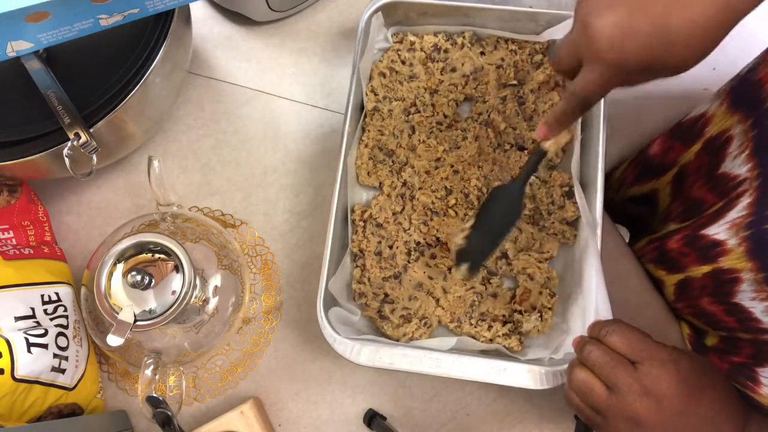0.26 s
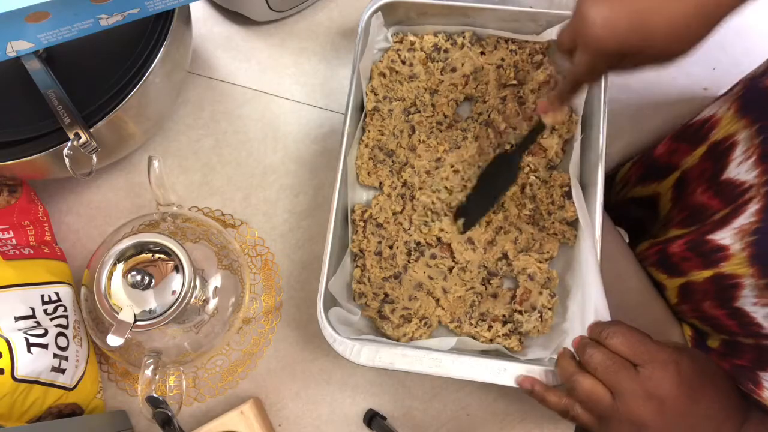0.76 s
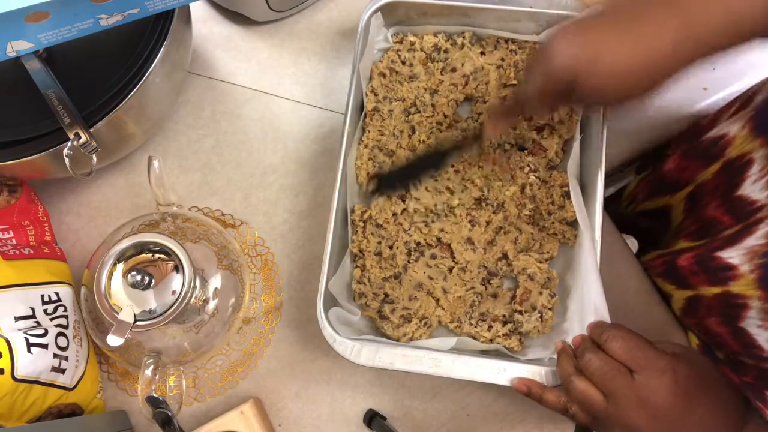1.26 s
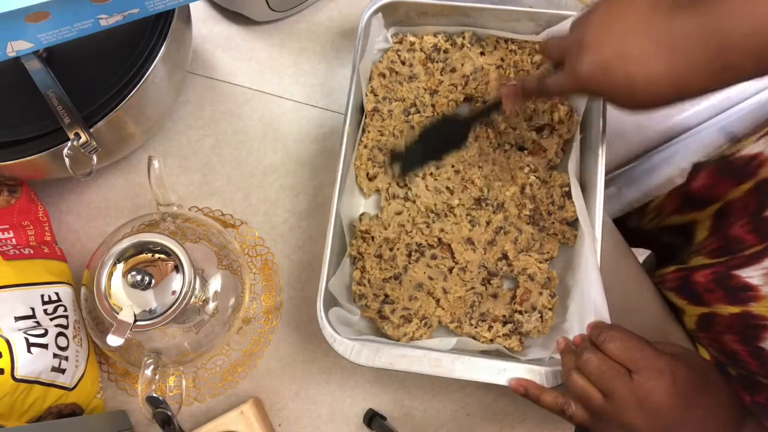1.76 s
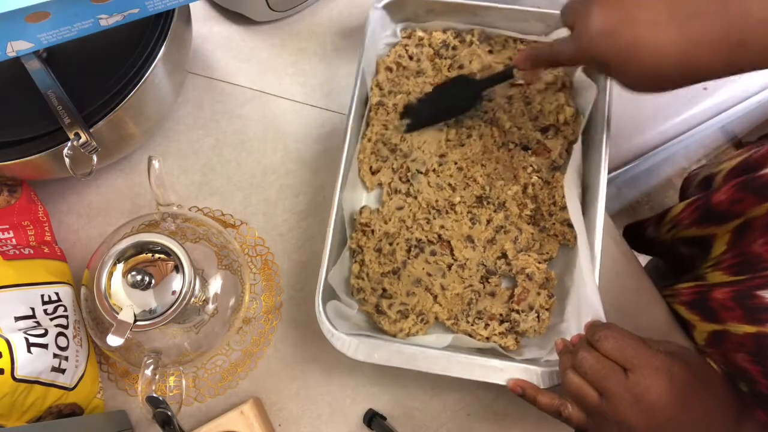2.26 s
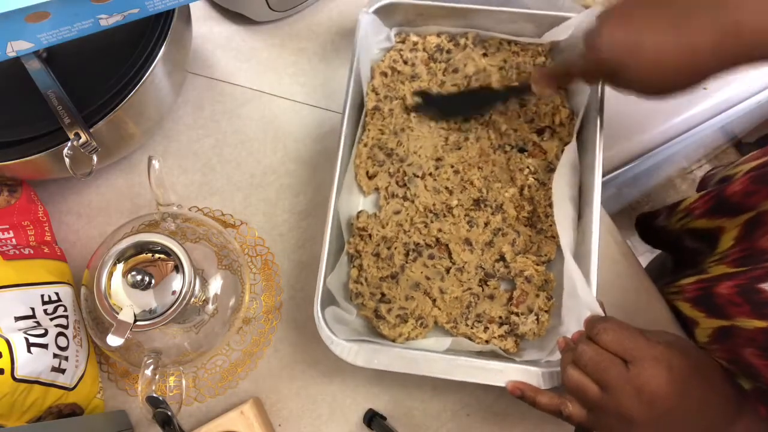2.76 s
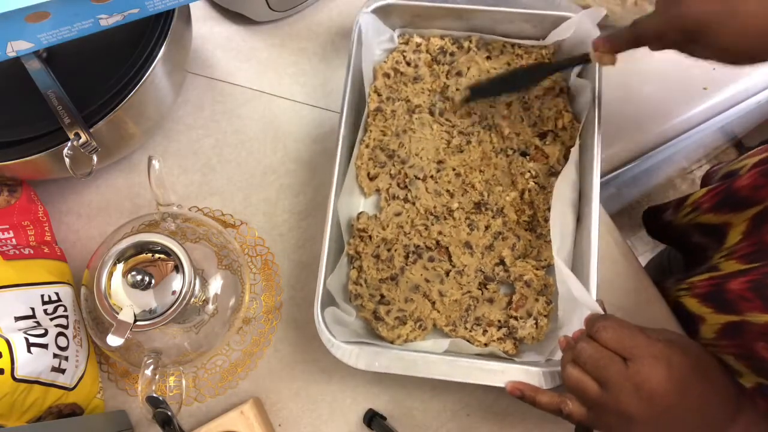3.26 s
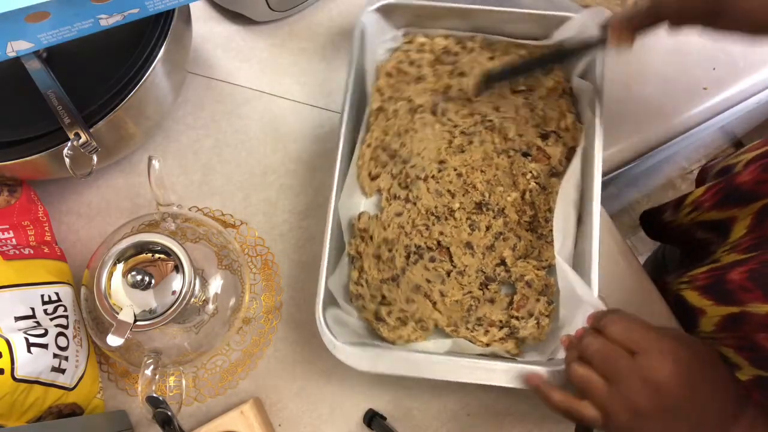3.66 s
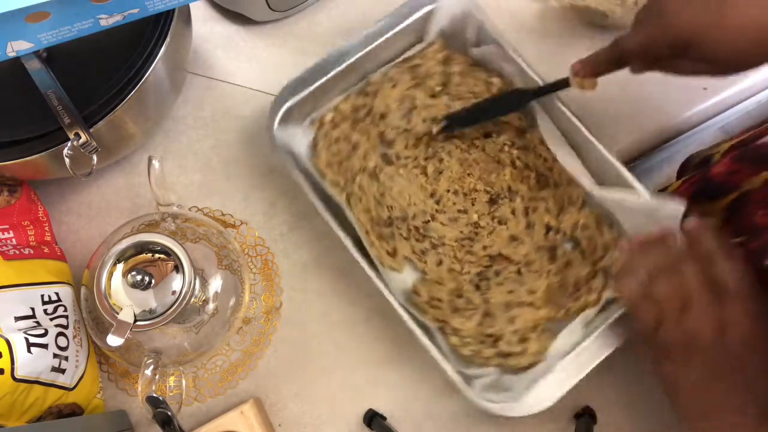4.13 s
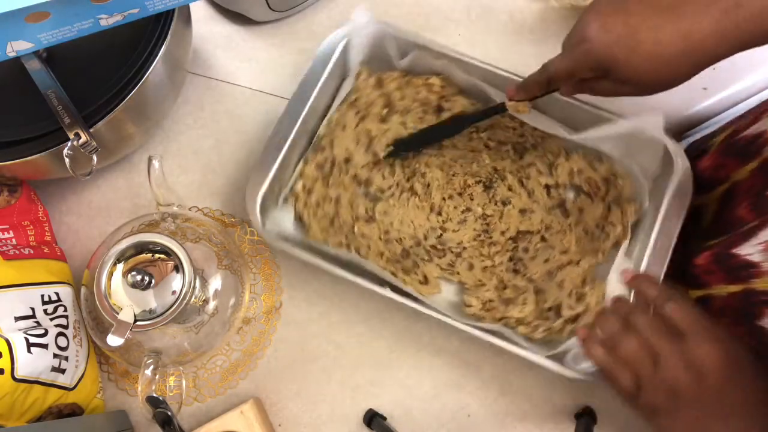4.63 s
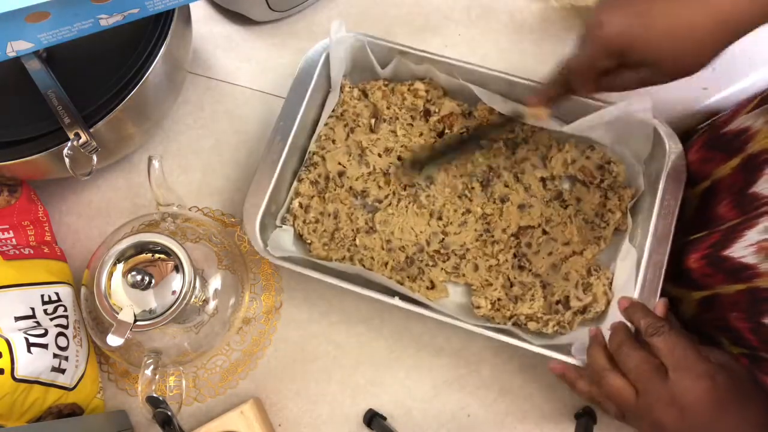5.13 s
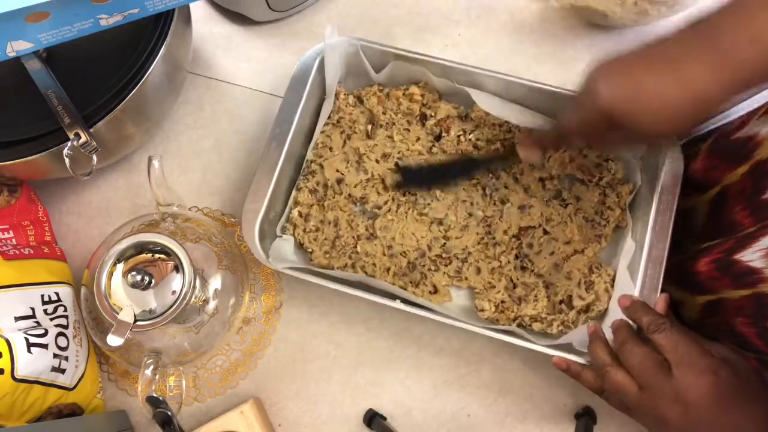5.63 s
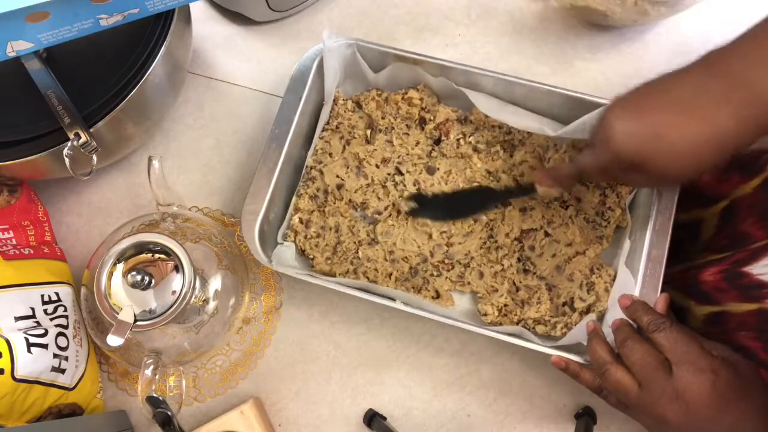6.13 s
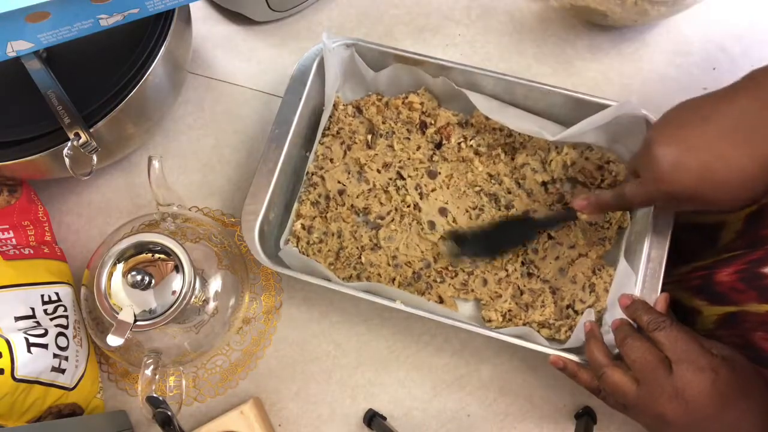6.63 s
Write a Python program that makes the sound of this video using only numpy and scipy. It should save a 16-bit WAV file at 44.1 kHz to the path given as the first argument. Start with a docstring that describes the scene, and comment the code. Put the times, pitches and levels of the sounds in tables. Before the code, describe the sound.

A small hard kitchen heard close up, with a low motor hum and soft rumble throughout. At 0.1 s sticky dough and parchment give crisp snaps, then a sharp one at 0.6. From 1.0 to 1.7 light crackles and short grainy spatula strokes pass, with a dull pat near 1.1. At 2.1 the pan knocks with a short damped metallic ring, another knock near 2.5 amid thick snaps and firmer rubs. Gritty strokes follow at 2.8, 3.1 and 3.4, with soft pats. After a lull, the loudest, brightest crinkling bursts at 3.85 to 4.05 as the pan is turned with a slide and low thud. Crackly shifting and rustle run from 4.35 to 5.0. From 5.25 to 6.4 separate grainy smears, a clear snap near 5.3 and soft pats continue, with fuller rustle after 6.15, thinning to faint ticks by 6.9.

```python
"""A small hard kitchen: a spatula presses sticky dough into a parchment-lined metal pan, close to the microphone.
Sheet and dough snap as short noise bursts, with faint ticks that follow the rubbing.
Dough and pan rub in short strokes of grainy noise over a rustle; the spatula pats as low puffs.
The pan knocks on the counter as decaying sine modes, and the walls add a short tail.
Behind it an appliance hums and rumbles as wavering tones over filtered noise."""
import sys
import numpy as np
from scipy import signal
from scipy.fft import rfft, irfft, next_fast_len
from scipy.io import wavfile
from scipy.ndimage import uniform_filter1d, map_coordinates

SR = 44100
rng = np.random.default_rng(int(sys.argv[2]) if len(sys.argv) > 2 else 0)


def generate_wav(signal):
    """Clip the signal to [-1, 1] and save it as 16-bit WAV at the path in sys.argv[1]."""
    frames = np.transpose(np.atleast_2d(signal))
    scaled = np.clip(frames, -1, 1) * 32767
    pcm = np.round(scaled).astype(np.int16)
    wavfile.write(sys.argv[1], SR, pcm)


N = 303849


def amp(db):
    """dB to gain."""
    return 10 ** (np.asarray(db) / 20)


def unit(x):
    """Scaled to rms 1."""
    return x / np.sqrt(np.mean(x ** 2) + 1e-20)


def along(points, hz):
    """Values between (f/Hz, value) points on a log frequency axis."""
    f, v = np.transpose(points)
    return np.interp(np.log(hz + 1), np.log(f + 1), v)


def wobble(rate):
    """A smooth random curve, rate knots a second."""
    knots = rng.standard_normal(int(N * rate / SR) + 4)
    return map_coordinates(knots, [np.arange(N) * rate / SR])


def filtered(x, response):
    """x with its spectrum multiplied by a response of frequency."""
    size = next_fast_len(x.shape[-1] + 4096)
    spectrum = rfft(x, size) * response(np.fft.rfftfreq(size, 1 / SR))
    return irfft(spectrum, size)[..., :x.shape[-1]]


def snaps(rows):
    """Each snap is a sharp noise burst; the buckled patch of sheet favours one band."""
    # spectrum of the snapping sheet: (f/Hz, level/dB)
    sheet = [(240, -45), (400, -8.5), (2710, -2), (4180, -2), (5780, -5), (7400, -5), (7990, -8.5),
             (11900, -12), (13300, -15.5), (16000, -10)]
    t60_s, crack_t60_s, rise_s = 0.032, 0.0038, 0.00053
    bass_octaves = 2.34  # a positive tilt lifts the bass too, by as much as this many octaves of treble
    out, t = np.zeros(N + SR), np.arange(4096) / SR
    for s, db, peak_hz, tilt_db in rows:
        def colour(hz):
            patch = 1 + 1.3 / (1 + ((hz - peak_hz) / (0.11 * peak_hz)) ** 2)
            treble_octaves = np.log2((np.minimum(hz, 11000) + 300) / 4000)
            bass = bass_octaves / (1 + (hz / 1800) ** 4)
            return amp(along(sheet, hz)) * patch * amp(tilt_db * (treble_octaves + bass))

        burst = filtered(rng.standard_normal(len(t)), colour)
        crack = filtered(burst, lambda hz: hz / (hz + 4000))  # the first instant is sharper and brighter
        burst = burst * amp(-60 * t / t60_s) + 3 * crack * amp(-60 * t / crack_t60_s)
        burst = burst * (1 - np.exp(-t / rise_s))
        out[round(s * SR):][:len(t)] += amp(db) * burst / np.abs(burst).max()
    return out[:N]


def ticks(rubbing, count=70):
    """Rows for faint snaps at random moments, stronger with the rubbing that frees them."""
    top_db = -44.5  # strongest peak while the rubbing is at -61 dB
    follows, scatter_db = 0.48, 3  # dB per dB of rubbing; mean drop below the strongest
    middle_hz = 2950
    draw = rng.random((count, 4))
    s = draw[:, 0] * (N - 1) / SR
    level = np.sqrt(np.abs(uniform_filter1d(rubbing ** 2, 1024)))
    rubbing_db = 20 * np.log10(level[(s * SR).astype(int)] + 1e-9)
    drop_db = scatter_db * np.minimum(-np.log(draw[:, 1]), 4)
    db = top_db + follows * (rubbing_db + 61) - drop_db
    peak_hz = middle_hz * 2 ** (2 * draw[:, 2] - 1)  # within an octave either way
    tilt_db = 6 * draw[:, 3] - 4
    return np.transpose([s, db, peak_hz, tilt_db])


def crumbs(size, rate=2500, centre_hz=3800, spread=0.54, cycles=0.93, size_db=4):
    """Grains of sugar and oats let go at random, each a tiny damped ring at its own pitch."""
    draw = rng.random((int(size * rate / SR), 3))
    hz = centre_hz * np.exp(spread * rng.standard_normal(len(draw)))
    hz = np.clip(hz, 600, 15000)[:, None]
    t = np.arange(128) / SR
    strength = amp(np.minimum(-size_db * np.log(draw[:, 1:2]), 13))
    # low grains ring longer, so they start weaker
    decay = hz * np.exp(-t * hz / cycles)
    rings = strength * decay * np.sin(2 * np.pi * (hz * t + draw[:, 2:]))
    at = (draw[:, :1] * size).astype(int) + np.arange(len(t))
    return unit(np.bincount(at.ravel(), rings.ravel())[:size])


def rub():
    """Dense tiny slips swell and fade under each stroke; the dragged sheet favours one band."""
    # spectrum of rubbing: (f/Hz, level/dB)
    rub_spectrum = [(250, -17.5), (500, -9.5), (900, -6.5), (1500, -1.5), (3000, -6), (4500, -5),
                    (8000, -8), (11000, -10.5), (16000, -12.5)]
    # restless sheet and pan, lifted by slow drags: (t/s, level/dB)
    rustle_levels = [(0, -66), (.2, -74), (.34, -67), (.42, -61.5), (.5, -71.5), (.86, -70.5), (.94, -59.5),
                     (1.1, -66.5), (1.5, -63.5), (1.64, -60.5), (1.9, -64.5), (2.02, -67.5), (2.2, -59),
                     (2.32, -62), (2.66, -65.5), (2.93, -72), (3.02, -62.5), (3.25, -68.5), (3.54, -70.5),
                     (3.7, -56.5), (4.14, -55), (4.3, -68), (4.4, -58), (4.56, -53), (4.96, -56.5),
                     (5.03, -66), (5.2, -62.5), (5.42, -67.5), (5.6, -63.5), (5.86, -65), (6.01, -67),
                     (6.17, -54), (6.57, -55), (6.65, -62), (6.89, -66)]
    # quick strokes that smear dough, drag paper or slide the pan: (t/s of full strength, hold/s, level/dB, f/Hz)
    strokes = [(0.055, 0.013, -50.5, 4500), (1.317, 0.072, -51.5, 2830), (1.699, 0.044, -55, 3000),
               (2.082, 0.097, -52, 3000), (2.399, .055, -50, 2500), (2.464, 0.019, -38.5, 1780),
               (2.722, 0.022, -52, 1970), (2.797, 0.031, -41, 1580), (3.088, 0.05, -42, 1630),
               (3.357, 0.028, -45, 1800), (3.874, .19, -48, 3500), (4.346, 0.0046, -41.5, 2000),
               (4.704, 0.013, -44, 4000), (4.8, 0.015, -54, 3500), (5.273, 0.052, -44.5, 3130),
               (5.669, 0.054, -44.5, 3360), (5.978, .019, -101, 3000), (6.059, 0.04, -44.5, 2640),
               (6.189, 0.034, -55, 2930), (6.263, 0.037, -47.5, 3080), (6.38, 0.026, -52, 3040),
               (6.79, 0.015, -54, 2560)]
    # edges to 1/e for a stroke held 50 ms; a shorter stroke has quicker edges
    rise_s, fall_s, edge_power = 0.02, 0.021, 0.24
    rustle_hz, bright_db, bright_db_per_octave = 3000, -3.5, 2  # a higher-pitched stroke is brighter
    dull_db_per_db = 0.16  # extra treble change per dB of rustle level above or below -58.5 dB
    lead = SR // 4  # strokes may start swelling before the scene does
    t = np.arange(-lead, SR // 2) / SR
    size = N + 2 * SR
    slow_db, fast_db = 1.5 * np.resize(wobble(45), size), 0.8 * np.resize(wobble(300), size)
    grit = rng.standard_normal(size) * amp(slow_db + fast_db)
    grains = unit(grit) + 0.42 * crumbs(size)

    def colour(peak_hz):
        treble_db = bright_db + bright_db_per_octave * np.log2(peak_hz / rustle_hz)

        def response(hz):
            top = amp(treble_db / (1 + (5000 / (hz + 1)) ** 4))
            band = 1 + 0.36 / (1 + ((hz - peak_hz) / (0.32 * peak_hz)) ** 2)
            return amp(along(rub_spectrum, hz)) * top * band
        return response

    level_db = np.interp(np.arange(size) / SR - 1 / 4, *np.transpose(rustle_levels))
    rustle = unit(filtered(grains[::-1], colour(rustle_hz)))  # reversed, to differ from the strokes
    treble = filtered(rustle, lambda hz: 1 / (1 + (6000 / (hz + 1)) ** 4))
    treble_gain = amp(dull_db_per_db * (level_db + 58.5))
    out = amp(level_db) * (rustle - treble + treble_gain * treble)
    for s, hold, db, peak_hz in strokes:
        before, after = np.maximum(-t, 0), np.maximum(t - hold, 0)
        away = (before / rise_s + after / fall_s) / (20 * hold) ** edge_power
        start = round(s * SR)
        stroke = unit(filtered(grains[start:][:len(t)], colour(peak_hz)))
        out[start:][:len(t)] += amp(db) * np.exp(-away ** 1.13) * stroke
    return out[lead:][:N]


def pats():
    """A soft contact of spatula on dough gives a short puff of noise without a ring."""
    # dull pats, level before the decay: (t/s, level/dB, f/Hz)
    pat_rows = [(.328, -48, 920), (.337, -42, 272), (1.088, -41, 600), (2.42, -38, 600), (2.795, -38, 1480),
                (3.272, -43, 675), (3.523, -45, 750), (3.577, -52, 1420), (4.013, -36, 447),
                (4.046, -43, 690), (4.347, -38.5, 1330), (4.7, -48, 500), (4.896, -50, 1250),
                (5.614, -46, 663), (5.959, -45.5, 1090)]
    octaves, t60_s, rise_s = 0.82, 0.032, 0.00034  # octaves from the centre to 6 dB down
    out, t = np.zeros(N + SR), np.arange(4096) / SR
    for s, db, peak_hz in pat_rows:
        puff = filtered(rng.standard_normal(len(t)),
                        lambda hz: amp(-6 * (np.log2((hz + 1) / peak_hz) / octaves) ** 2))
        envelope = amp(db - 60 * t / t60_s) * (1 - np.exp(-t / rise_s))
        out[round(s * SR):][:len(t)] += envelope * unit(puff)
    return out[:N]


def ring(modes, t, tilt_db=0, share=1):
    """One blow: each mode at a slightly random strength, tilted in dB/octave; a held body dies sooner."""
    out = np.zeros(len(t))
    for hz, db, t60 in modes:
        strength_db = db + rng.normal(0, 1) + tilt_db * np.log2(hz / 645)
        out += amp(strength_db - 60 * t / (t60 * share)) * np.sin(2 * np.pi * hz * t)
    return out


def knocks():
    """The pan rings briefly, damped by the dough; the counter thuds and rumbles on."""
    # pan on counter, level before a common 7 dB gain:
    # (t/s, level/dB, counter thud level/dB, pan treble tilt/dB per octave, share of full ring length)
    knock_rows = [(2.13, -21.5, -6.5, 4.5, 0.49), (2.498, -26, -9, 2.5, 0.66), (2.538, -43, -6, 2, 0.94),
                  (3.891, -43, -2.5, -14, 0.4)]
    # modes of the metal pan: (f/Hz, level/dB, t60/s)
    pan_modes = [(408, -26.5, .12), (640, 4.5, 0.071), (1078, -2.5, 0.1), (1625, -10, 0.1),
                 (1830, -29, 0.1), (2200, -12, 0.063), (2680, -26.5, 0.078), (2910, -6.5, 0.037),
                 (3450, -22, 0.091), (3768, -7.5, 0.053), (3793, -25, 0.18)]
    # modes of the counter: (f/Hz, level/dB, t60/s)
    counter_modes = [(98, -15, 0.76), (155, -19, 0.04), (224, -6, 0.14), (357, -33, 0.32)]
    out, t = np.zeros(N + SR), np.arange(SR // 2) / SR
    for s, db, thud_db, tilt_db, share in knock_rows:
        metal = ring(pan_modes, t, tilt_db, share) * (1 - np.exp(-t / 0.0067))
        rumble = unit(filtered(rng.standard_normal(len(t)),
                               lambda hz: hz / (hz + 80) / (1 + (hz / 400) ** 2)))
        thud = ring(counter_modes, t, share=share) + 0.23 * amp(-60 * t / 0.3) * rumble
        thud = amp(thud_db) * thud * (1 - np.exp(-t / 0.0044))
        out[round(s * SR):][:len(t)] += amp(db + 7.0) * (metal + thud)
    return out[:N]


def walls(x):
    """Short tail of hard walls: decaying noise, drawn anew for every third of a second of sound."""
    # decay of the room: (f/Hz, t60/s)
    room_decay = [(300, 0.27), (1500, 0.13), (5000, 0.14), (14000, 0.13)]
    out, step = np.zeros(N + 2 * SR), SR // 3
    delay = 130  # samples, about 3 ms
    for start in range(0, N, step):
        hz, t, z = signal.stft(rng.standard_normal(SR // 4), SR, nperseg=128)
        decay = amp(-60 * t / along(room_decay, hz)[:, None])
        tail = signal.istft(z * decay, SR, nperseg=128)[1]
        wet = signal.fftconvolve(x[start:start + step], tail / np.linalg.norm(tail))
        out[start + delay:][:len(wet)] += wet
    return out[:N]


def kitchen():
    """Room tone of filtered noise under a motor hum whose tones waver in pitch and level."""
    # spectrum of the room tone: (f/Hz, level/dB)
    air_spectrum = [(15, -16), (25, -7), (105, 4), (180, -6), (223, -9), (463, -11), (936, -16.5),
                    (1020, -13.5), (1290, -17), (2160, -26), (2690, -31.5), (3820, -30), (16000, -68)]
    # hum tones, level about which each wavers: (f/Hz, waver/Hz, level/dB)
    hum_tones = [(121.3, 2.964, -56.5), (240.4, 3.44, -67.5), (316.3, 5.84, -69)]
    air_db = -56
    air = unit(filtered(rng.standard_normal(N), lambda hz: amp(along(air_spectrum, hz))))
    out = amp(air_db + wobble(1.073)) * air
    for tone_hz, waver_hz, db in hum_tones:
        phase = 2 * np.pi * np.cumsum(tone_hz + waver_hz * wobble(12)) / SR
        out = out + amp(db + 2.5 * wobble(9)) * np.sin(phase)
    return out


def scene():
    """Close sounds, their echo and the room tone; the pan's long ring gains less from the walls."""
    # clear snaps of parchment and sticky dough, and the sharp contact crack of the pan's knocks at 2.13 s and
    # 2.50 s: (t/s, peak level/dB, favoured f/Hz, treble tilt/dB per octave)
    snap_rows = [(.0679, -18, 4800, 2.5), (.1109, -24, 2150, 4), (.5896, -16, 4800, 6),
                 (.658, -35, 4870, -2), (.6757, -36, 1670, -5), (.7237, -35.5, 5500, -4),
                 (1.03, -40, 4140, -7), (1.0873, -30, 2570, -3), (1.1258, -34, 4740, -2),
                 (1.1712, -28.5, 5440, 0.5), (1.2428, -38.5, 1030, 1), (1.325, -30.5, 3540, 8),
                 (1.3735, -31, 4040, -8), (1.495, -33, 4070, -3.5), (1.5404, -30, 1520, -1.5),
                 (1.656, -21, 4730, 0), (1.7113, -41, 4730, -3), (2.1265, -14.5, 1070, -7),
                 (2.1454, -24, 1720, 0), (2.1962, -22, 2950, -3), (2.2223, -31.5, 1590, -6),
                 (2.2687, -31, 4830, 4.5), (2.3485, -25, 1920, 1), (2.3958, -21.5, 3420, 2.5),
                 (2.4217, -16, 2010, 2), (2.4658, -16, 2610, 8), (2.4967, -23, 1110, -8),
                 (2.6593, -44, 1480, -4), (2.7602, -26.5, 1520, -3), (2.796, -18, 3240, 4),
                 (2.8398, -28, 1550, -3.5), (3.0858, -34, 1460, -2), (3.0979, -21.5, 3700, -7),
                 (3.1186, -15.5, 4600, 6), (3.1628, -21, 3680, 4), (3.316, -35.5, 1360, -10),
                 (3.3667, -28.5, 1320, 11), (3.3789, -25.5, 6600, -2), (3.4251, -39, 3400, -3),
                 (3.456, -32, 2080, -0.5), (3.7828, -37, 3540, .7), (3.8212, -35, 6610, .7),
                 (3.8554, -19, 2870, 3.5), (3.8724, -28, 2830, 0), (3.8797, -30, 4000, 1),
                 (3.8876, -9, 5870, 4.5), (3.9068, -21, 6200, 16), (3.9335, -21.5, 3920, 6),
                 (3.9639, -15.5, 4640, 4), (3.9906, -20.5, 3730, 6), (4.01, -18.5, 8060, 3.5),
                 (4.0264, -23.5, 4030, 5), (4.0457, -28.5, 3020, 0), (4.104, -35.5, 1460, -3),
                 (4.341, -33, 2200, 10), (4.352, -22.5, 4500, 10), (4.3807, -18.5, 6240, 11),
                 (4.4614, -33.5, 2110, -4), (4.7, -25, 6000, 5.5), (4.7115, -26, 5500, 1),
                 (4.7275, -24.5, 4000, 8), (4.733, -23.5, 3500, 5.5), (4.7818, -44, 1920, -1),
                 (4.805, -23.5, 3720, 5), (4.8958, -29, 3640, -3.5), (5.0637, -39.5, 1310, -7),
                 (5.138, -40, 2500, 0), (5.1656, -29, 3720, -5), (5.226, -38, 3910, 4),
                 (5.2407, -30.5, 4200, -2.5), (5.2847, -28, 5730, 1), (5.298, -33, 5000, -2),
                 (5.3313, -18.5, 3030, 7.5), (5.6154, -26, 6960, -5), (5.688, -26, 2730, 8),
                 (6.11, -31, 1390, 3.5), (6.2492, -31, 6900, -1), (6.4662, -26.5, 3520, -3.5),
                 (6.6678, -36, 3440, 5), (6.6967, -31.5, 4500, 0), (6.8105, -39.5, 1540, -11)]
    rubbing = rub()
    paper = snaps(snap_rows) + snaps(ticks(rubbing)) + pats() + rubbing
    pan = knocks()
    echo = walls(amp(-8.5) * paper + amp(-17) * pan)
    return (paper + pan + echo + kitchen())[None]


def record(dry):
    """The low end thins out below 45 Hz; the treble falls steeply near 16 kHz and ends at top_hz."""
    # level at the ends of the spectrum: (f/Hz, level/dB)
    edge = [(20, -28), (45, -3), (15700, -0.5), (16100, -28), (16900, -36)]
    top_hz = 16850
    return filtered(dry, lambda hz: amp(along(edge, hz)) * (hz < top_hz))


dry = scene()
out = record(dry)
generate_wav(out)
```